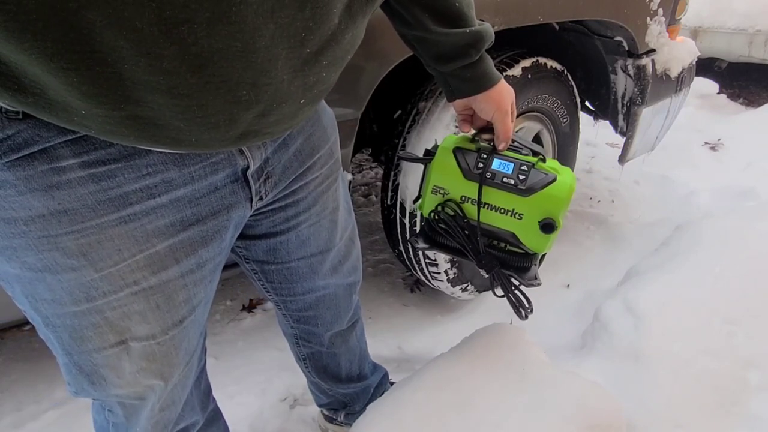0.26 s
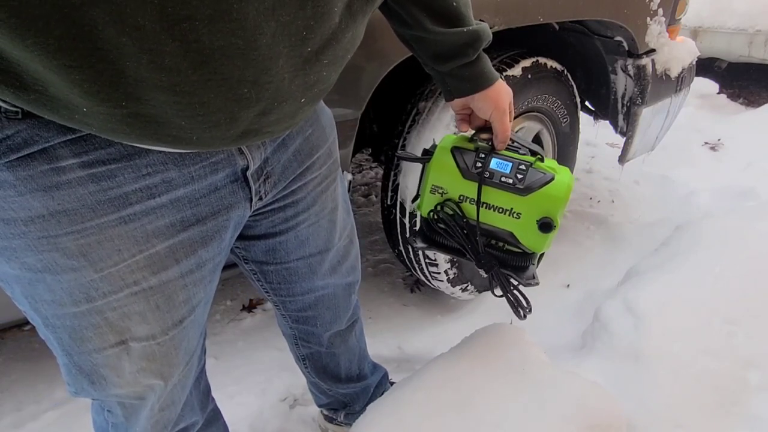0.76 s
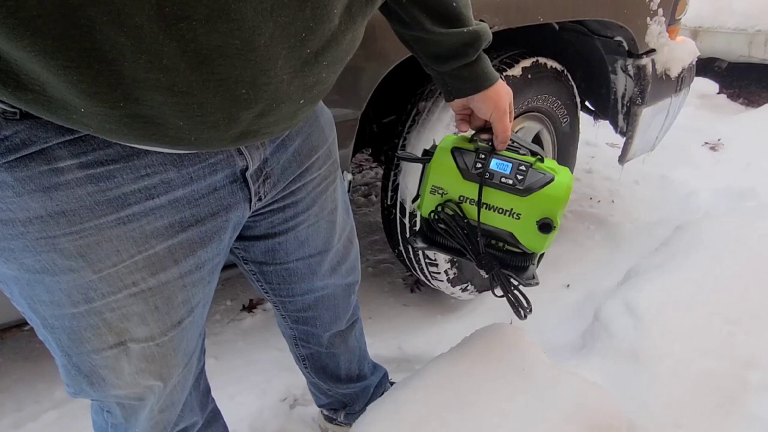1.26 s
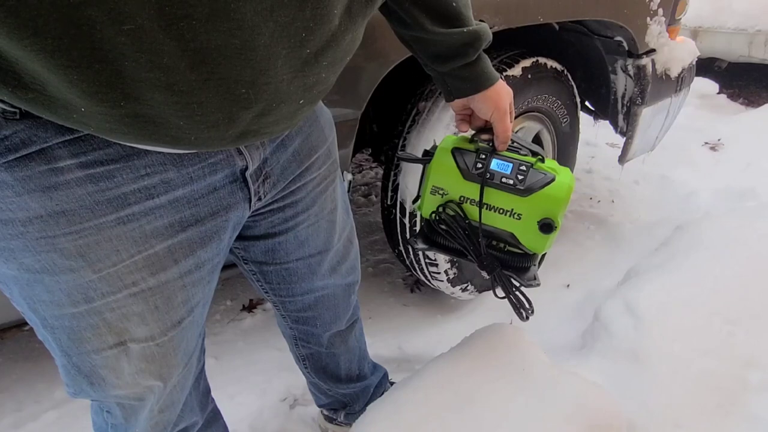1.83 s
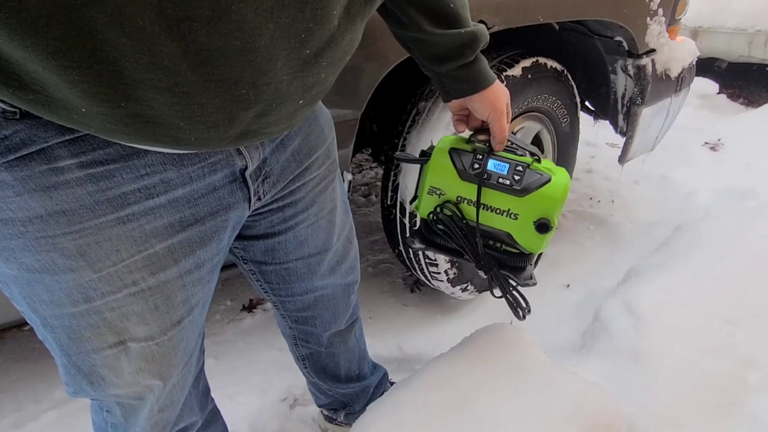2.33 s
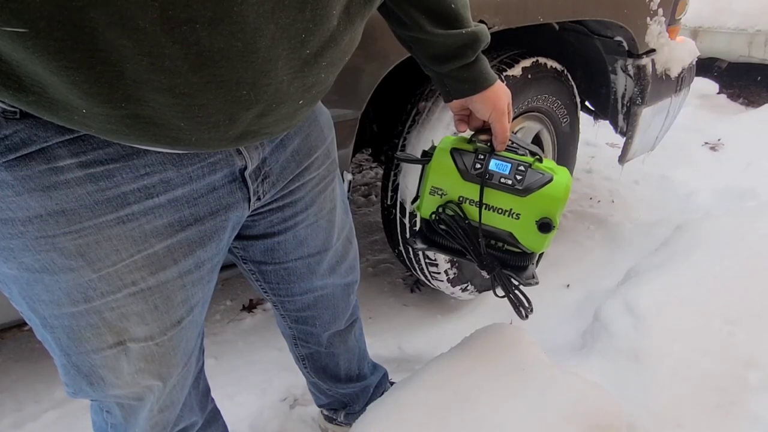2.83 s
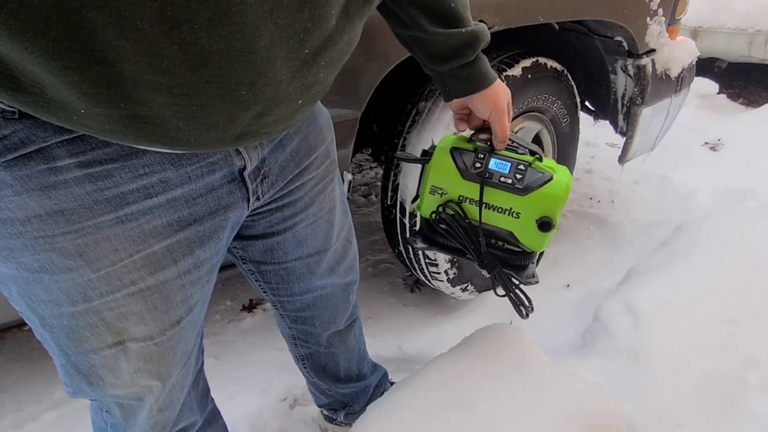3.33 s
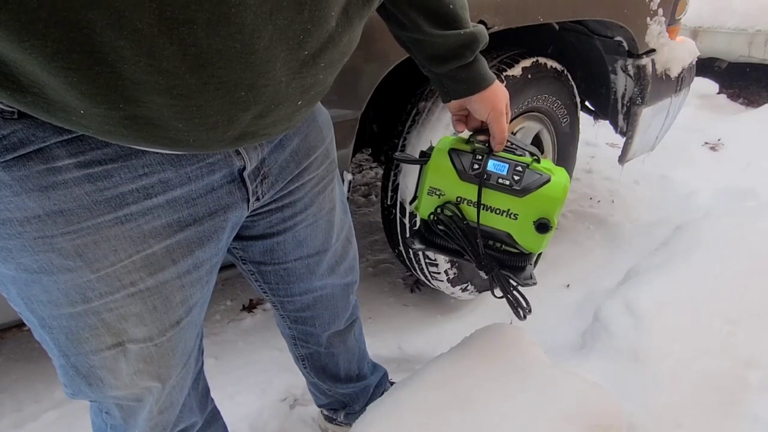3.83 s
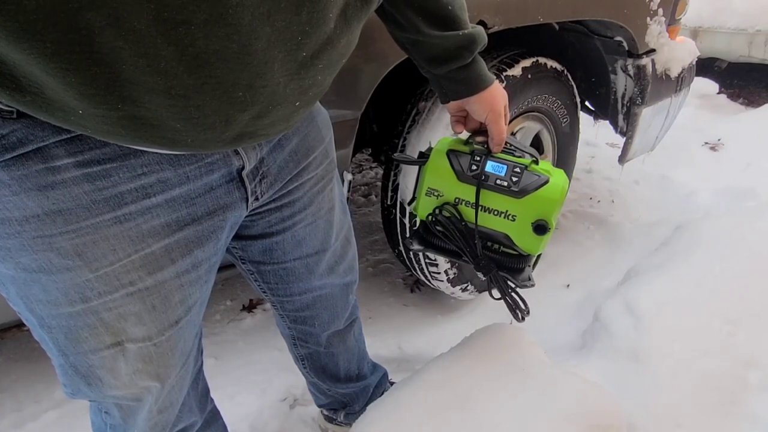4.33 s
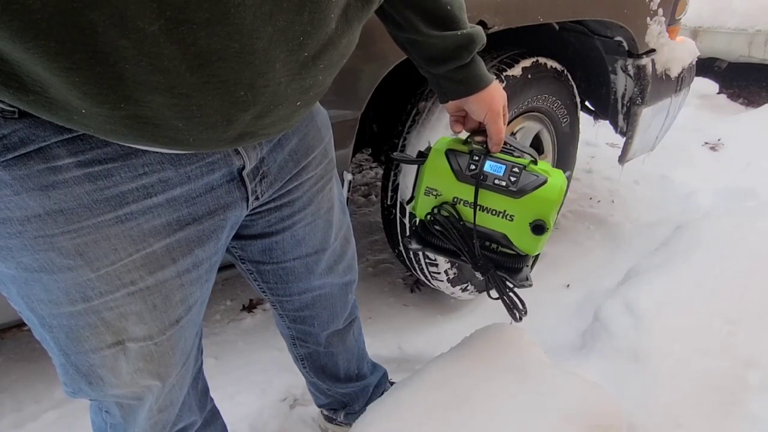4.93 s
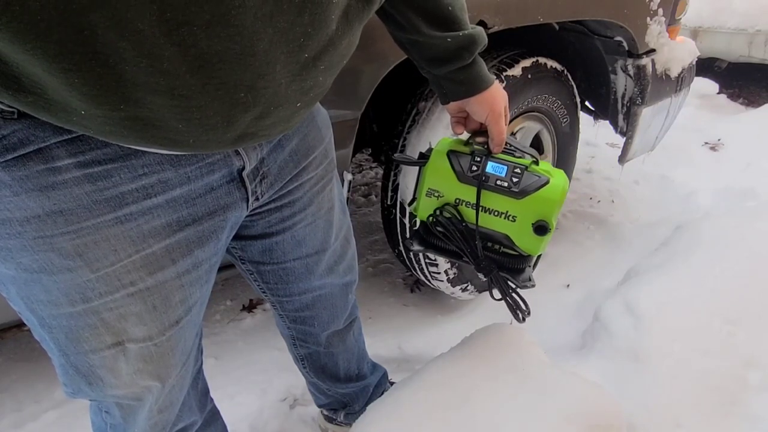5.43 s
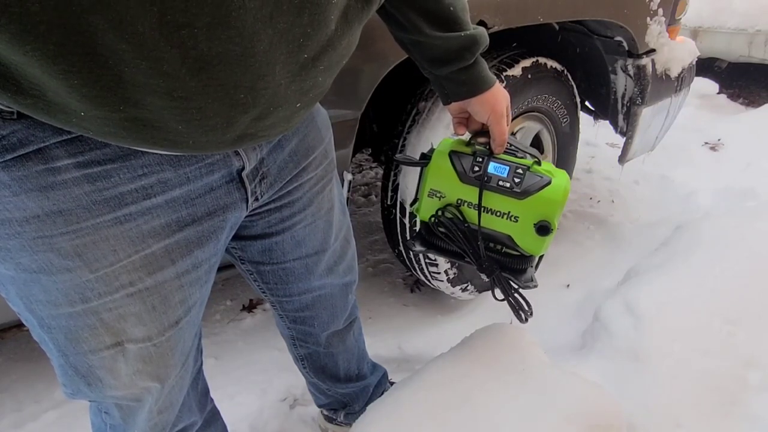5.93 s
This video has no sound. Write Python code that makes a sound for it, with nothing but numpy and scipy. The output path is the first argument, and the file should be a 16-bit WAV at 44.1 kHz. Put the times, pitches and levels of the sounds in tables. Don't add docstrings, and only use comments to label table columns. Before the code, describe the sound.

A handheld battery air pump runs without pause while filling a vehicle tire outdoors on snow. Its motor drones with a fast, buzzing piston chatter, a singing gear whine and bright hissing puffs of air fused into a rough rasp. A vehicle engine idles low and faintly behind. Close stereo microphone, dry open air, no echo, slightly thin, grainy treble.

```python
import sys
import numpy as np
from scipy import signal
from scipy.fft import rfft, irfft, next_fast_len
from scipy.io import wavfile
from scipy.ndimage import uniform_filter1d

SR = 44100
rng = np.random.default_rng(int(sys.argv[2]) if len(sys.argv) > 2 else 0)


def field_ratio(decibels):
    return 10 ** (np.asarray(decibels, dtype=float) / 20)


def wav_out(sig):
    wavfile.write(sys.argv[1], SR, np.round(np.clip(np.atleast_2d(sig).T, -1, 1) * 32767).astype(np.int16))


N = 272524
SIZE = next_fast_len(N)


def evened(x):
    return x / np.sqrt(np.mean(x ** 2) + 1e-20)


def read(points, hz):
    point_hz, value = np.transpose(points)
    return np.interp(np.log(hz + 1), np.log(point_hz + 1), value)


def over_time(rows):
    start_s, value = np.transpose(rows)
    return np.interp(np.arange(N) / SR, start_s, value)


def wander(hz):
    z = rfft(rng.standard_normal(SIZE))
    lowpass = 1 / (1 + (np.fft.rfftfreq(SIZE, 1 / SR) / hz) ** 4)
    return evened(irfft(z * lowpass, SIZE)[:N])


def tone(turns, level_db, left_right_db, lead_rad):
    angle = 2 * np.pi * turns + np.array([[-lead_rad / 2], [lead_rad / 2]])
    balance = field_ratio([[left_right_db / 2], [-left_right_db / 2]])
    return np.sqrt(2) * field_ratio(level_db) * balance * np.cos(angle)


# freq_hz, likeness [0-1]
SAME = [(60, 0.99), (300, 0.9), (600, 0.88), (900, 0.24), (1700, 0.68), (2400, 0.32), (3300, 0.12),
        (8000, 0.17), (9500, 0.5), (11500, .1), (13300, 1), (15500, .4)]
# freq_hz, left_right_db
BALANCE_DB = [(60, 5), (270, -15), (450, 5), (700, 3), (900, -5.5), (1150, 4.5), (1500, -3.5), (2400, -3.5),
              (3400, 1.5), (8800, -2), (9400, -2), (11200, -5), (13000, -6), (15500, -5)]
# freq_hz, lead_rad
LEAD = [(0, 0), (650, 0.7), (900, -1.2), (1800, -0.37), (2400, 0.87), (16000, -130)]
# freq_hz, width_hz, depth [0-1]
GROUND_DIPS = [(3450, 67, 0.25), (3932, 64, 1), (4120, 58, 0.2), (4980, 210, 0.46), (7850, 230, 0.28),
               (8630, 210, 0.27)]


def heard(a, b, points, rings):
    hz = np.fft.rfftfreq(SIZE, 1 / SR)
    power = field_ratio(2 * read(points, hz))
    for freq_hz, width_hz, level_db in rings:
        power = power + field_ratio(2 * level_db) / (1 + (2 * (hz - freq_hz) / width_hz) ** 2) ** 2
    for freq_hz, width_hz, depth in GROUND_DIPS:
        dip = np.clip(depth, 0, 0.95) / (1 + (2 * (hz - freq_hz) / width_hz) ** 2)
        power = power * (1 - dip) ** 2
    same = np.clip(read(SAME, hz), 0, 1)
    lead_rad = np.interp(hz, *np.transpose(LEAD))
    left = rfft(a, SIZE)
    right = same * left * np.exp(1j * lead_rad) + np.sqrt(1 - same ** 2) * rfft(b, SIZE)
    tilt = field_ratio(read(BALANCE_DB, hz) / 2)
    ports = np.array([left * tilt, right / tilt])
    return evened(irfft(np.sqrt(power) * ports, SIZE)[:, :N])


def blown(envelope, points, rings):
    a, b = envelope * rng.standard_normal((2, N))
    return heard(a, b, points, rings)


# start_s, pitch_hz
IDLE = [(0.15, 151.9), (0.94, 152.7), (1.08, 154.1), (1.67, 151.4), (1.82, 153.3), (3.35, 152.8),
        (3.48, 151.2), (4.57, 151.3), (4.87, 153), (5.42, 153.6), (6.1, 151)]
# pitch_hz, width_hz, level_db [rms]
IDLE_TONES = [(33.8, 2, -57), (53.4, 0.65, -42.5), (73.2, 2.2, -45.5), (107.1, 2.7, -41), (128, 2.6, -43.5)]


def idling():
    idle_db, misfire_db, misfire_hz = -35, 1.5, 8.7
    level = field_ratio(idle_db + misfire_db * wander(misfire_hz))
    engine = np.sqrt(2) * level * np.cos(2 * np.pi * np.cumsum(over_time(IDLE)) / SR)
    t_s = np.arange(N) / SR
    for pitch_hz, width_hz, level_db in IDLE_TONES:
        angle = 2 * np.pi * pitch_hz * t_s
        fuzzy = wander(width_hz) * np.cos(angle) + wander(width_hz) * np.sin(angle)
        engine = engine + field_ratio(level_db) * fuzzy
    return engine * field_ratio([[-0.6], [0.6]])


# freq_hz, level_db [per Hz]
ROAR = [(25, -34), (55, -14), (120, -15), (200, -21.5), (370, -25), (480, -16), (800, -19), (1100, -15),
        (1500, -19.5), (3000, -19), (5000, -22.5), (7000, -26), (8900, -29), (15500, -27)]
# freq_hz, width_hz, level_db
ROAR_RINGS = [(581.3, 85, -3), (641, 137, -6), (997, 75, -13), (2080, 105, -13.5), (2878, 170, -16)]


def roar(crank):
    roar_db, sway_db, sway_hz = -20, 0.67, 16.6
    breath_db = 0.87 * np.cos(2 * np.pi * (crank - 0.1))
    swell = field_ratio(sway_db * wander(sway_hz) + breath_db + 1.02 * wander(68))
    return field_ratio(roar_db) * blown(swell, ROAR, ROAR_RINGS)


GEAR_TEETH, PINION_TEETH, ROTOR_SLOTS = 53, 11, 3


def motor(crank):
    rotor = crank * GEAR_TEETH / PINION_TEETH
    drag_turns = 0.12 * np.sin(2 * np.pi * (crank - 0.17))
    current = 1 + 0.3 * np.cos(2 * np.pi * (crank - 0.15))
    commutator = tone(ROTOR_SLOTS * rotor - drag_turns, -23, 0.51, 0.61)
    imbalance = tone(rotor, -56, -5, 0)
    return current * field_ratio(0.28 * wander(13)) * commutator + imbalance


# level_db [rms], left_right_db
MESH = [(-44.5, -17), (-72, -7), (-88, 6), (-74, 2), (-42, -10.5), (-39.5, -1), (-31.5, -1), (-30.5, -2),
        (-34.5, -12), (-47, -9), (-73, -1), (-65, 10), (-44.5, -3)]


def gear(crank):
    skew_turns = 0.01
    loaded = crank + 0.048 + 0.0033 * wander(22)
    mesh = GEAR_TEETH * crank + 0.017 * wander(30)
    first = 0
    for side, (level_db, left_right_db) in zip(range(-7, 6), MESH):
        turns = mesh + side * loaded - skew_turns * side ** 2
        first = first + tone(turns, level_db, left_right_db, 0.79)
    burst = np.exp(1.3 * (np.cos(2 * np.pi * loaded) - 1))
    second = burst * tone(2 * mesh - crank, -31.5, -1.4, 2.27)
    return field_ratio(1.1 * wander(31)) * (first + second)


# level_db [rms], left_right_db
THUMP = [(-45, -1), (-40, -0.5), (-69, -1), (-78, -5), (-44.5, 0), (-46, -1), (-50.5, 6), (-58.5, 4),
         (-38, 5.5), (-42, 8.5), (-39, 3), (-31.5, 0.5), (-43, 15), (-37.5, -2), (-40, -6), (-40, -9),
         (-56, -27), (-47, -2), (-48.5, -14), (-50.5, -9), (-46, -11.5), (-54, -2), (-47, 12), (-49.5, 18),
         (-56, 13), (-63, 6), (-64, -7), (-48.5, 1), (-47.5, -9), (-48, -18)]


def thump(crank):
    turn = np.linspace(0, 1, num=4097)
    cycle = 0
    for k, (level_db, left_right_db) in enumerate(THUMP, start=1):
        offset = scatter = rng.random()
        if k < 13:
            offset = 0.57 - 0.105 * k + 0.4 * (scatter - 0.5) * (k < 9)
        lead_rad = 0.037 * k * (k < 17)
        cycle = cycle + tone(k * turn + offset, level_db, left_right_db, lead_rad)
    shaky = (crank + 0.00095 * wander(30)) % 1
    return np.array([np.interp(shaky, turn, port) for port in cycle])


def puff(crank, opens, rise, fall, spread_db, jitter):
    stroke = np.floor(crank + 0.27).astype(int)
    chance = rng.standard_normal((stroke.max() + 1, 2))[stroke]
    since = (crank + 0.407) % 1 - 0.4 - opens - jitter * chance[:, 1]
    attack = np.exp(-(since / rise) ** 2)
    decay = np.exp(-np.abs(since) / fall)
    return np.where(since < 0, attack, decay) * field_ratio(spread_db * chance[:, 0])


# freq_hz, level_db [per Hz]
AIR = [(700, -56), (1500, -18), (3000, -9.5), (5000, -11.5), (7000, -9.5), (8900, -24), (9800, -9),
       (11200, -29.5), (12300, -4), (13100, -20), (14000, 1), (15000, -11), (15550, -8)]
# freq_hz, width_hz, level_db
AIR_RINGS = [(4770, 250, -14), (6880, 300, -9), (9430, 350, -5), (11800, 300, -17), (13350, 270, -1),
             (14600, 340, 3.5)]
# freq_hz, level_db [per Hz]
SPIT = [(2500, -40), (5000, -17.5), (9000, -24), (12000, -19.5), (14000, -16), (15500, -10), (16500, -12)]
# freq_hz, width_hz, level_db
SPIT_RINGS = [(9350, 330, -15), (13530, 300, -4.5), (14750, 570, 0.5)]


def valve(crank):
    air_db, spit_db, sway_db, sway_hz = -22.5, -23.5, 0.4, 1.3
    grit = field_ratio(sway_db * wander(sway_hz) + 2.0 * wander(500))
    leak = 0.25
    gust = grit * (leak + puff(crank, -0.13, 0.067, 0.34, 0.8, 0.022))
    opening = puff(crank, -0.055, 0.018, 0.067, 1.3, 0.013)
    rebound = 0.58 * puff(crank, 0.053, 0.02, 0.05, 3.4, 0.012)
    spit = grit * (opening + rebound)
    air = field_ratio(air_db) * blown(gust, AIR, AIR_RINGS)
    return air + field_ratio(spit_db) * blown(spit, SPIT, SPIT_RINGS)


# start_s, rate_hz [strokes per s]
SPEED = [(0.0, 45.323), (0.687, 45.315), (1.373, 45.18), (2.06, 45.158), (2.747, 44.968), (3.433, 45.113),
         (4.12, 45.089), (4.807, 45.098), (5.493, 45.102), (6.18, 45.053)]


def scene():
    start_turn = 0.929
    crank = start_turn + np.cumsum(over_time(SPEED)) / SR
    return idling() + roar(crank) + motor(crank) + gear(crank) + thump(crank) + valve(crank)


# freq_hz, level_db [re mean line level of the wide band]
MASK = [(2400, -33), (3200, -7.5), (4200, -3), (6000, -10.5), (8500, -1.5), (11000, -3.5), (12500, -12),
        (14000, -25)]


def thinned(x):
    hole_db, hole_spread_db = -5.5, 2.5
    hz, _, z = signal.stft(x, SR, window="cosine", nperseg=2048, noverlap=1024)
    frames = z.shape[2]
    mask_db = read(MASK, hz)[:, None]
    power = abs(z) ** 2
    wide = uniform_filter1d(power.mean((0, 2)), size=60)[:, None]
    shift = 4.2 * rng.standard_normal((frames, 129))
    shift_db = np.repeat(shift, repeats=8, axis=1)[:, :len(hz)].T
    limit = wide * field_ratio(2 * (mask_db + shift_db))
    kept = power ** 4 / (power ** 4 + limit ** 4 + 1e-60)
    band = uniform_filter1d(power.mean(0), size=10, axis=0)
    band = uniform_filter1d(band, size=2, axis=1)
    mood = evened(uniform_filter1d(rng.standard_normal((frames, 65)), size=3, axis=0))
    mood_db = hole_spread_db * np.repeat(mood, repeats=16, axis=1)[:, :len(hz)].T
    floor_db = hole_db + mood_db + np.minimum(mask_db + 6, 0)
    around = uniform_filter1d(wide, size=40, axis=0) * field_ratio(2 * floor_db)
    kept = kept * band ** 6 / (band ** 6 + around ** 6 + 1e-90)
    return signal.istft(z * kept, SR, window="cosine", nperseg=2048, noverlap=1024)[1][:, :N]


def roll_off(x):
    return signal.sosfilt(signal.butter(12, 16710, fs=SR, output="sos"), x)


def record(dry):
    edge_hz, knee, headroom = 15560, 0.6, 0.33
    edge = signal.firwin(801, edge_hz, window=("kaiser", 9), fs=SR)[None]
    x = signal.oaconvolve(thinned(dry), edge, "same")
    over = np.maximum(abs(x) - knee, 0)
    x = x - np.sign(x) * (over - headroom * np.tanh(over / headroom))
    x = signal.oaconvolve(x, edge, "same")
    return roll_off(x)


dry = scene()
out = record(dry)
wav_out(out)
```